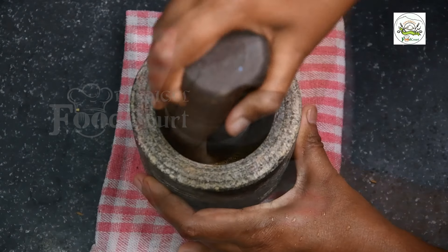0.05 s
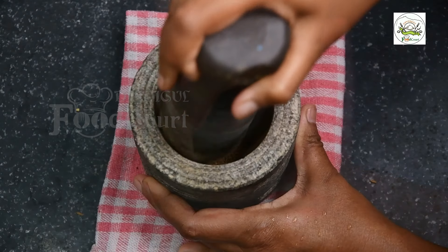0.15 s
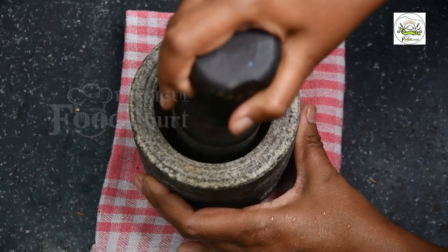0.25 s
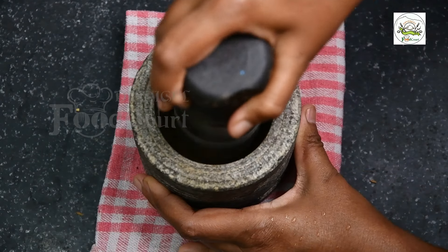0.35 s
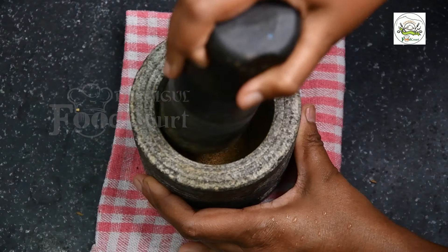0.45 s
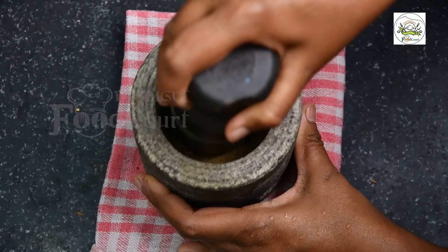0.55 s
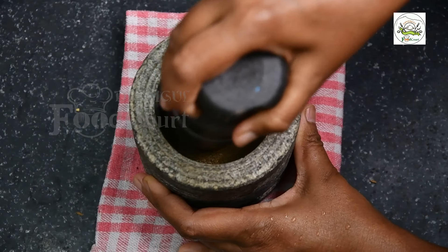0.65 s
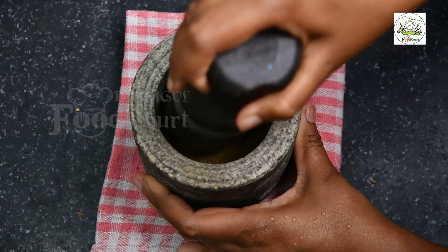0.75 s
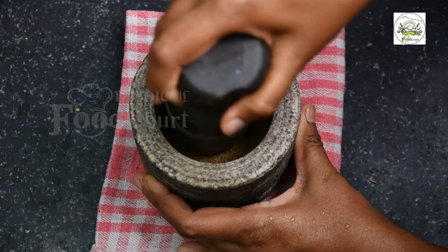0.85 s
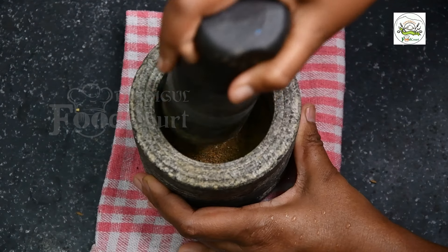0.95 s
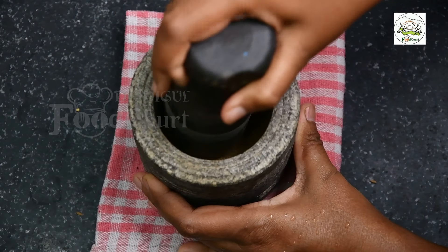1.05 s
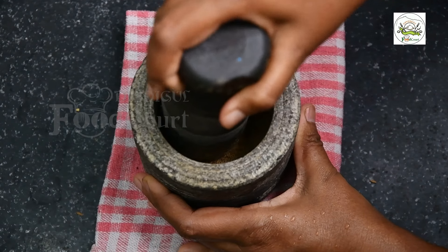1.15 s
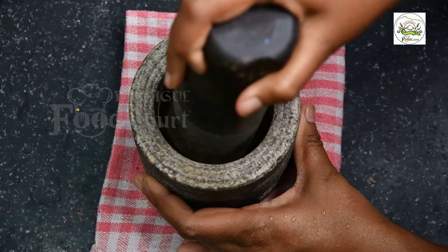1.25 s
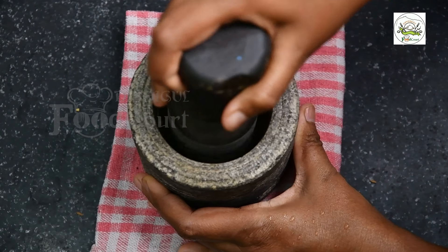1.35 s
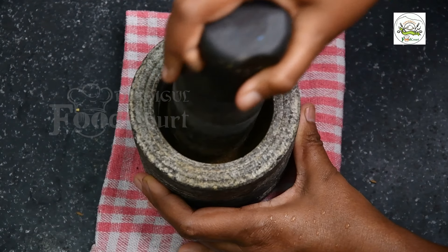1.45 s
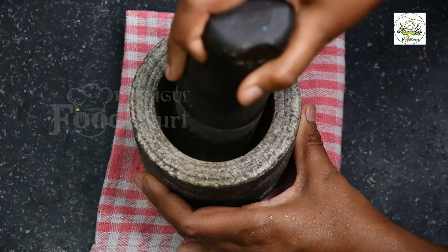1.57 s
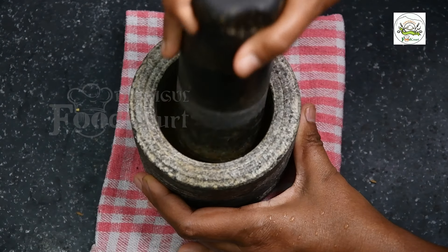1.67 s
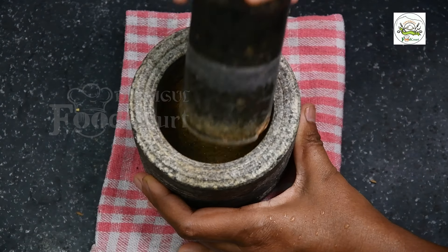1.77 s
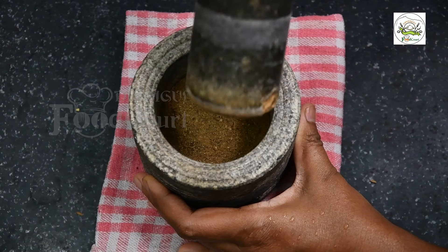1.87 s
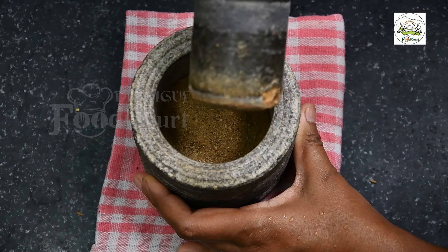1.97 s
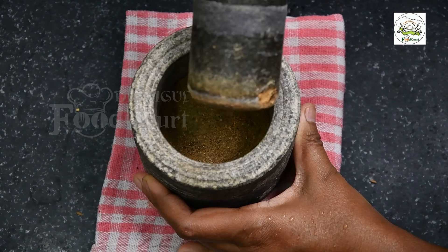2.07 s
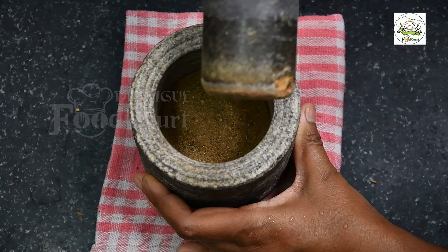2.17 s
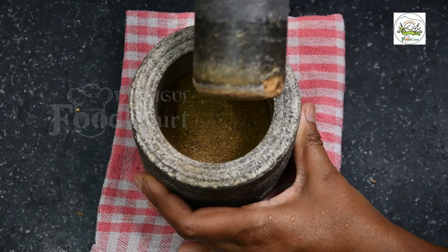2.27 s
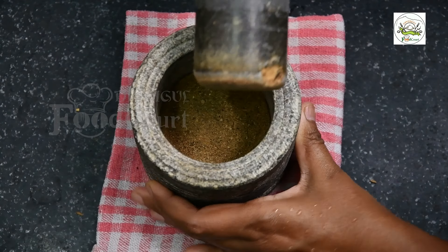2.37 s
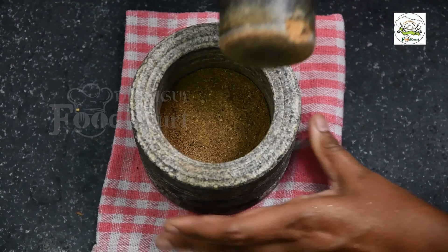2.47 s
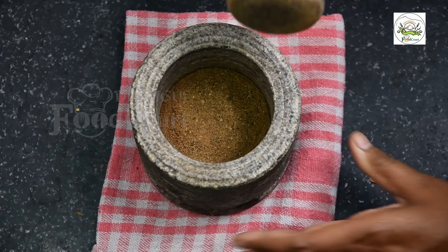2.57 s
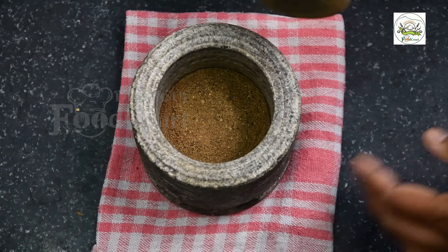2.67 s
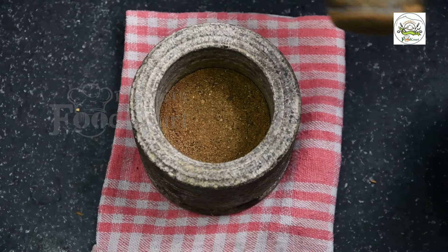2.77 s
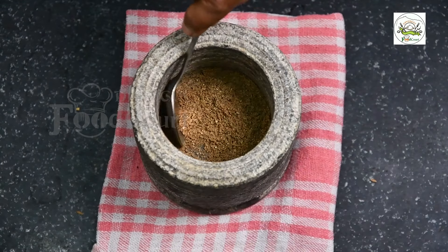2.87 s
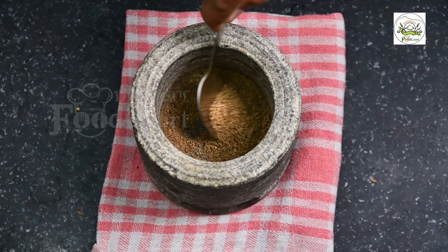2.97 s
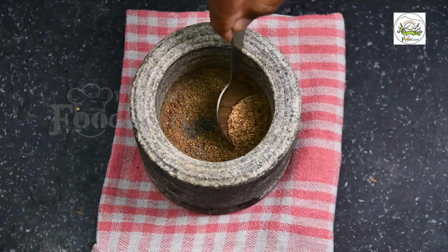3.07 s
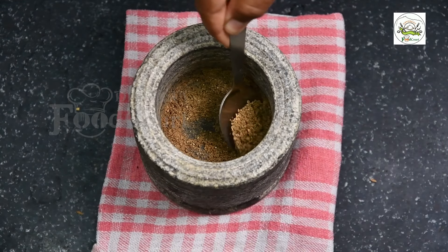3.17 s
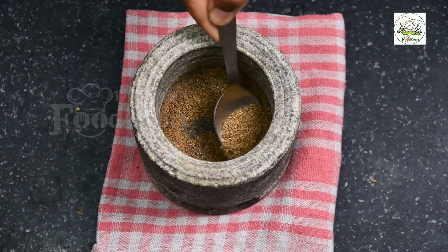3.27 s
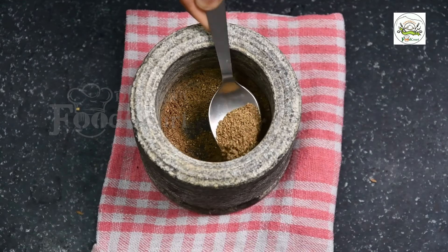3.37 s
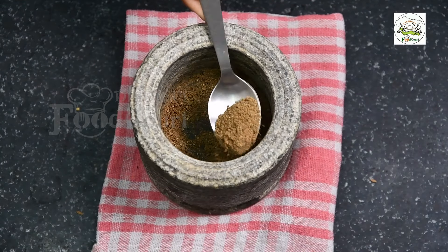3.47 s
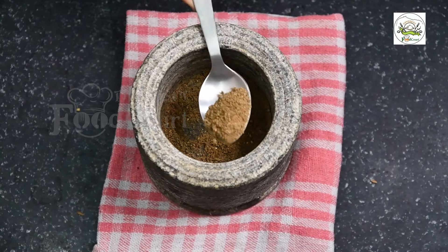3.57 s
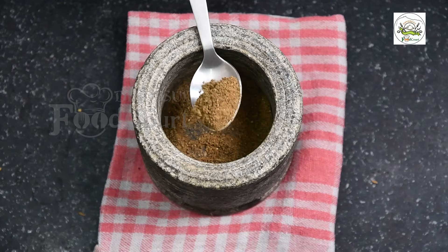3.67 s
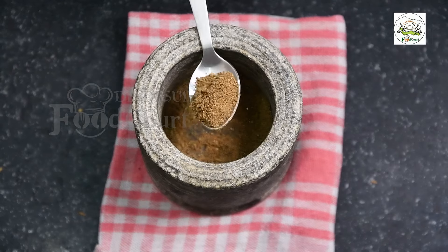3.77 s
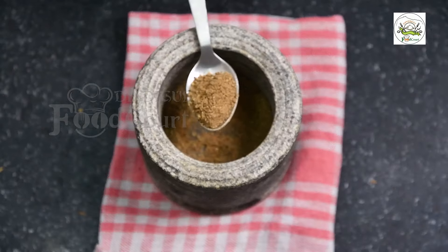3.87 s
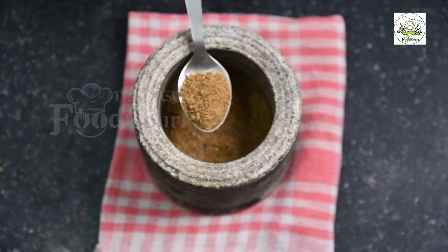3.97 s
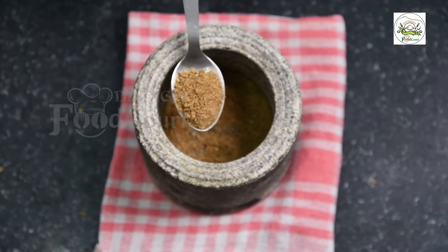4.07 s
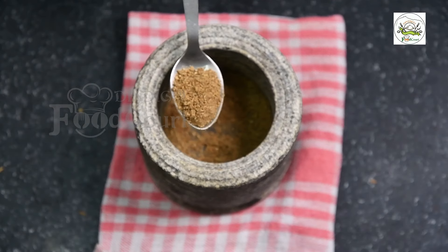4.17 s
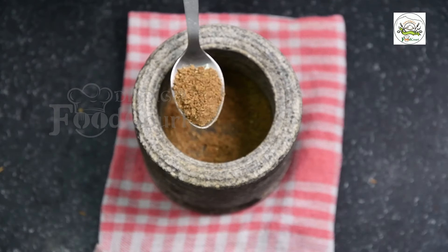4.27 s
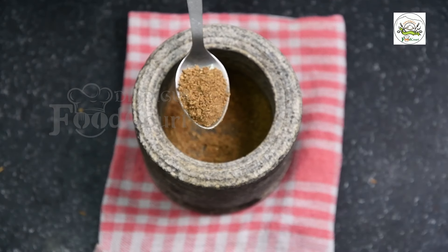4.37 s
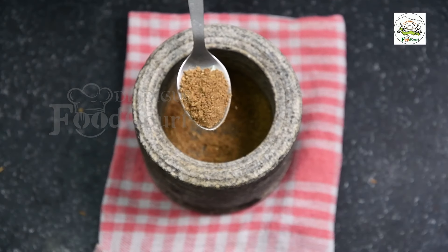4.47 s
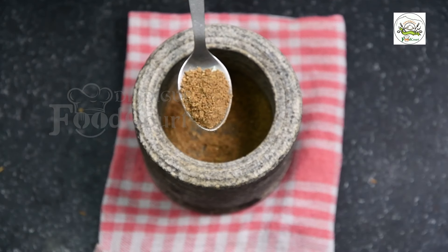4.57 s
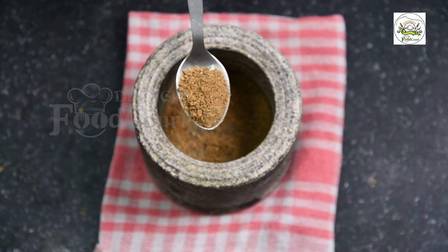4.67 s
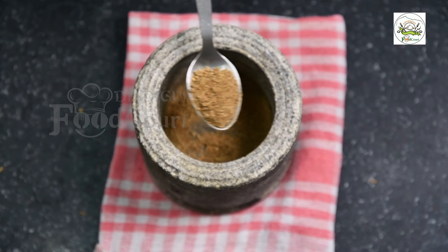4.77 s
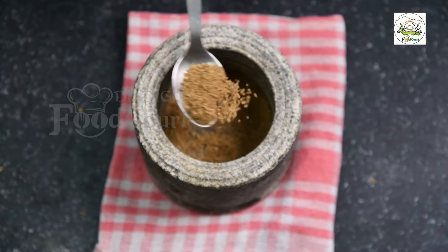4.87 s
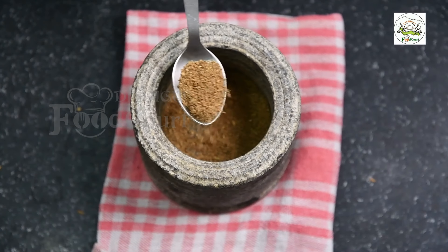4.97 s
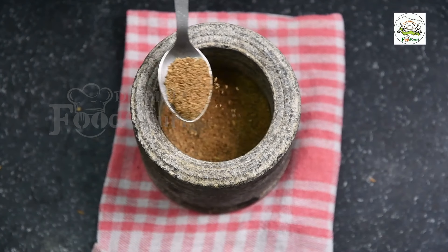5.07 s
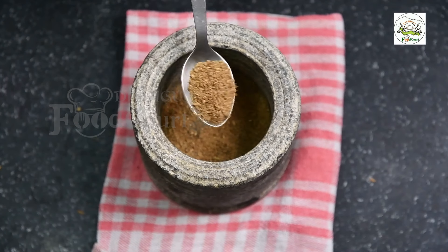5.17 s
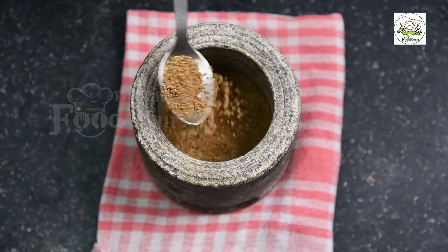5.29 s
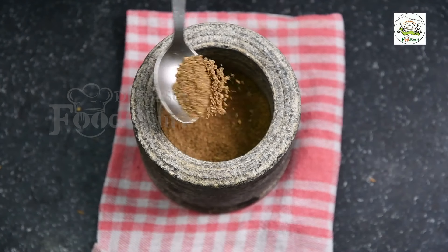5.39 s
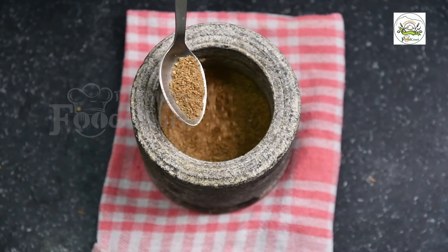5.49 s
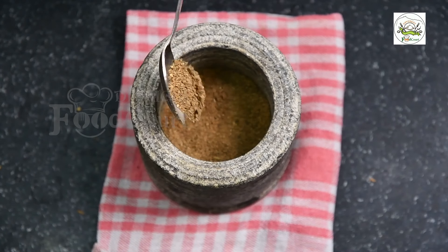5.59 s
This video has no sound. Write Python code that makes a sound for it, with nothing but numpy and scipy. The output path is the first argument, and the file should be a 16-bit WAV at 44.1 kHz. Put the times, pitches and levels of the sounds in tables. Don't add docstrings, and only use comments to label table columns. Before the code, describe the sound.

Heavy hollow stone thumps in a hard kitchen stop after two seconds; quiet spoon scraping and one small rim tap follow over faint hiss.

```python
import sys
import numpy as np
from scipy import signal
from scipy.fft import rfft, irfft, next_fast_len
from scipy.io import wavfile

SR = 44100
rng = np.random.default_rng(int(sys.argv[2]) if len(sys.argv) > 2 else 0)


def int16_out(signal):
    q = np.round(np.clip(np.atleast_2d(signal).T, -1, 1) * 32767)
    wavfile.write(sys.argv[1], SR, q.astype(np.int16))


def gain_from_db(level_db):
    decades = np.asarray(level_db, float) / 20
    return 10 ** decades


N = 248283


def unit(x):
    return x / np.sqrt(np.mean(x ** 2) + 1e-20)


def peak(x):
    return x / np.abs(x).max()


def noise(count):
    return rng.standard_normal(count)


def along(points, hz):
    point_hz, value = np.transpose(points)
    return np.interp(np.log(hz + 1), np.log(point_hz + 1), value)


def filtered(x, response):
    size = next_fast_len(len(x) + SR // 10)
    spectrum = rfft(x, size) * response(np.fft.rfftfreq(size, 1 / SR))
    return irfft(spectrum, size)[:len(x)]


def resonances(peaks, scatter_db=0):
    gains = gain_from_db(np.array(peaks)[:, 2] + scatter_db * noise(len(peaks)))

    def response(f):
        total = 0
        for k, ((hz, width_hz, _), gain) in enumerate(zip(peaks, gains)):
            damping = 1j * f * width_hz
            total = total + (-1) ** k * gain * damping / (hz * hz - f * f + damping)
        return total
    return response


def highpass(f, corner_hz, order):
    return (1j * f / (corner_hz + 1j * f)) ** order


def ringing(modes, swell_s, t):
    total = 0
    for hz, level_db, t60_s in modes:
        total = total + gain_from_db(level_db + rng.standard_normal() - 60 * t / t60_s) * np.sin(2 * np.pi * hz * t)
    return (1 - np.exp(-t / swell_s)) * total


def struck(response, contact_s, soft_hz, t):
    push = t / contact_s * gain_from_db(-60 * t / contact_s) * (1 + .3 * noise(len(t)))
    rounded = lambda f: 1 / (1 + .9j * f / soft_hz - (f / soft_hz) ** 2) ** 4
    return peak(filtered(push, lambda f: response(f) * rounded(f)))


# hz, t60_s
KITCHEN = [(100, 1), (500, .55), (1200, 0.77), (2400, 0.6), (3300, 0.5), (4300, 0.38), (7500, .4),
           (11000, 0.078)]
# delay_s, level_db
WALLS = [(.004, -6.5), (.009, -17.5), (0.0135, -10.5), (0.017, -12), (0.028, -16.5), (0.056, -19.5)]


def add(track, start_s, sound, wet_db):
    hz, t, z = signal.stft(noise(3 * SR // 4), SR, nperseg=256)
    tail = signal.istft(z * gain_from_db(-60 * t / along(KITCHEN, hz)[:, None]), SR, nperseg=256)[1]
    tail = np.pad(tail / np.linalg.norm(tail), (round(0.0045 * SR), 0))
    for delay_s, level_db in WALLS:
        tail[round(delay_s * SR)] += gain_from_db(level_db + 4)
    heard = gain_from_db(wet_db) * signal.fftconvolve(sound, tail)
    heard[:len(sound)] += sound
    start = round(start_s * SR)
    part = track[max(start, 0):][:len(heard) + min(start, 0)]
    part += heard[max(-start, 0):][:len(part)]


def air(hz, width_hz, under_db):
    modes = resonances([(0.6 * hz, 250, under_db - 10.5), (.48 * hz + 440, 0.84 * width_hz, under_db),
                        (hz, width_hz, 0), (1.193 * hz, 170, -16)])
    return lambda f: modes(f) * highpass(f, 450, 3)


def knocked(peaks):
    modes = resonances(peaks, 1.0)
    return lambda f: modes(f) * highpass(f, 1100, 2)


# hz, level_db, t60_s
BOOM = [
    (96.75, 2, 0.54),
    (106.3, -5, 0.68),
    (72, -21, .3),
]


def boom(start_s, level_db):
    start = round(max(start_s, 0) * SR)
    t = np.maximum(np.arange(N) / SR - start_s, 0)[start:][:SR]
    return np.pad(gain_from_db(level_db) * ringing(BOOM, 0.013, t), (start, N))[:N]


# start_s, peak_db, air_hz, thud_db, crack_db
BLOWS = [
    (-.2, -1.5, 1190, -14, -1.5),
    (0.0339, 3.5, 1269, -8, -23),
    (0.2947, -1, 1220, -8.5, -23.5),
    (.560, -27, 1160, -19.5, -28),
    (.824, -9, 1195, -15, -25),
    (1.0917, -1.5, 1200, -9, -22),
    (1.3423, 2, 1242, -11, -11.5),
    (1.6076, 4.5, 1239, -12, -13.5),
    (2.0651, -1.5, 1110, -33, -7),
    (2.35, -9.5, 1126, -47, -20),
]
# blow_db, width_hz
AIR_WIDTH = [(-26, 200), (-8, 140), (-.5, 115), (3, 65), (6.5, 50)]
# blow_db, contact_hz
HARDNESS = [(-28, 1600), (-10, 2300), (-6.5, 3000), (3, 3400)]
# hz, width_hz, level_db
STONE = [(1604, 130, -4.5), (2154, 250, -9.5), (2650, 68, -9), (3060, 430, -11), (3714, 230, -11),
         (4335, 750, -11)]
# hz, level_db, t60_s
PESTLE = [(7537, 0, .05), (7400, -10, .03), (8942, -7, .025)]
# hz, width_hz, level_db
COUNTER = [(159.3, 83, -1.5), (235.5, 40, 4), (306, 74, 1.5), (433, 38, 6.5), (570, 83, 1.5), (737, 37, -1),
           (830, 65, -1)]
BOOM_DB, BOOM_LOSS = -18, 0.24
RING_DB, RING_GROWS = -35, 1.1
THUD_LATE_S, THUD_FIRST_DB = .0108, -3.5


def pestle_blows():
    track, t = np.zeros(N), np.arange(SR // 5) / SR
    for start_s, peak_db, air_hz, thud_db, crack_db in BLOWS:
        width_hz = np.interp(peak_db, *np.transpose(AIR_WIDTH))
        hard_hz = np.interp(peak_db, *np.transpose(HARDNESS))
        blow = gain_from_db(peak_db) * struck(air(air_hz, width_hz, under_db=-6), 0.0043, 2400, t)
        crack = gain_from_db(crack_db + 1.5) * struck(knocked(STONE), 0.0013, hard_hz, t)
        ring = gain_from_db(RING_DB + RING_GROWS * crack_db) * ringing(PESTLE, 0.0027, t)
        add(track, start_s, gain_from_db(4.0) * (blow + crack + ring), wet_db=-11.0)
        thud = gain_from_db(thud_db) * struck(resonances(COUNTER, 0.73), 0.0013, hard_hz / 3, t)
        add(track, start_s + 0.00057, gain_from_db(THUD_FIRST_DB) * thud, wet_db=-6)
        add(track, start_s + THUD_LATE_S, thud, wet_db=-4.5)
        track += boom(start_s + 0.015, thud_db + BOOM_DB - BOOM_LOSS * peak_db)
    return track


# time_s, level_db, pitch_hz
DRONE = [(2.801, -75.5, 308), (3.03, -71, 314), (3.27, -83, 309), (3.33, -64.5, 306), (3.5, -88, 303),
         (3.619, -62.5, 306), (3.74, -80, 298), (3.92, -90, 311), (3.97, -61, 312), (4.14, -80, 310),
         (4.2, -63, 305), (4.34, -70.5, 308), (4.68, -72, 310), (4.78, -63.5, 306), (5.2, -63, 318),
         (5.38, -79.5, 304), (5.44, -65.5, 309), (5.63, -69.5, 300)]


def appliance():
    time_s, level_db, pitch_hz = np.transpose(DRONE)
    t = np.arange(N) / SR
    flutter = filtered(noise(N), lambda f: 1 / (1 + (f / 28) ** 4))
    phase = 2 * np.pi * np.cumsum(np.interp(t, time_s, pitch_hz)) / SR
    return gain_from_db(np.interp(t, time_s, level_db)) * unit(flutter * np.sin(phase))


# hz, level_db_per_hz
HISS = [(15, -58), (25, -28), (43, -25.5), (210, -12.5), (306, -3.5), (445, -16), (850, -14.5), (1080, -17),
        (1270, -14), (1580, -20.5), (2120, -26), (3730, -34), (15600, -61.5)]
HISS_DB = -69


def hiss():
    return gain_from_db(HISS_DB) * unit(filtered(noise(N), lambda f: gain_from_db(along(HISS, f))))


# start_s, peak_db, wall_hz, air_db, ring_db
KNOCKS = [(.016, -27, 2879, -9, -45.5), (0.194, -9, 2650, -5.5, -22.5), (0.2134, -26, 2990, 6.5, -30.5),
          (0.255, -38.5, 2690, -10, -4.5), (.5207, -10.5, 2650, -12, -32), (0.5462, -11.5, 2650, -10, -35),
          (0.8148, -6, 2612, -9, -35.5), (0.9371, -18.5, 2650, -3, -45), (1.0402, -16.5, 2600, -4.5, -33.5),
          (1.078, -30.5, 2506, -1, -17.5), (1.1861, -21, 2654, -1.5, -23), (1.237, -42.5, 2700, -3.5, -8),
          (1.307, -42.5, 2700, -4.5, -8), (1.6908, -11, 2250, -9.5, -45.5), (1.713, -24, 2250, 5.5, -41.5),
          (1.763, -21.5, 2764, 5, -36.5), (2.451, -36, 2080, -12.5, -56.5)]
KNOCK_SOFT, KNOCK_SHARPENS = 1.2, .8


def wall_knocks():
    track, t = np.zeros(N), np.arange(SR // 5) / SR
    for start_s, peak_db, wall_hz, air_db, ring_db in KNOCKS:
        soft_hz = wall_hz * (KNOCK_SOFT + KNOCK_SHARPENS * gain_from_db(peak_db))
        wall = struck(knocked([(wall_hz, 200, 3)] + STONE), .0006, soft_hz, t)
        puff = gain_from_db(air_db + 0.5) * struck(air(1200, 150, under_db=4), 0.006, 2100, t)
        ring = gain_from_db(ring_db - 4.5) * ringing(PESTLE, .0015, t)
        add(track, start_s, gain_from_db(peak_db + 1.5) * (wall + puff + ring), wet_db=-10.0)
    return track


# start_s, level_db
SPRAY = [
    (0.072, -40.5),
    (0.296, -57),
    (0.549, -56),
    (0.561, -48),
    (0.823, -54),
    (1.095, -59.5),
    (1.351, -55),
    (1.62, -64),
    (2.07, -53),
]
# hz, level_db_per_hz
POWDER = [(1500, -32), (2800, 4), (5000, -7.5), (9000, -13.5), (12000, -26), (14000, -43.5), (16000, -69.5)]
SPRAY_T60_S, SPRAY_SWELL_S = .11, .0005


def powder_spray():
    track, t = np.zeros(N), np.arange(SR // 5) / SR
    for start_s, level_db in SPRAY:
        grit = unit(filtered(noise(len(t)), lambda f: gain_from_db(along(POWDER, f))))
        swell = 1 - np.exp(-(t / SPRAY_SWELL_S) ** 2)
        burst = 1 + 3 * gain_from_db(-60 * t / .006)
        add(track, start_s, gain_from_db(level_db - 60 * t / SPRAY_T60_S) * swell * burst * grit, wet_db=-13.5)
    return track


# centre_s, level_db, half_length_s
TRAFFIC = [
    (2.499, -81.5, .2),
    (3.05, -79, 0.31),
    (3.95, -77.5, 0.4),
    (4.555, -90.5, 0.24),
    (5.102, -87, 0.21),
    (5.66, -81.5, .1),
]


def traffic():
    t = np.arange(N) / SR
    low = unit(filtered(noise(N), lambda f: resonances([(100, 50, 0)])(f) ** 2))
    level = sum(gain_from_db(db - 7.6 * ((t - centre_s) / half_s) ** 2) for centre_s, db, half_s in TRAFFIC)
    return level * low


# centre_s, level_db, hz, width_hz
CREAKS = [(2.808, -66, 1710, 397.4), (2.871, -61.5, 1470, 594), (2.86, -62, 934, 203),
          (2.95, -58.5, 905, 200), (3.58, -72, 1293, 69.8), (3.706, -62, 1070, 200), (3.929, -70, 1300, 70),
          (3.859, -69.5, 1728, 70), (3.921, -75, 1766, 70), (4.369, -87, 2727, 70), (4.84, -84.5, 2710, 70),
          (5.02, -81, 2700, 70), (5.411, -88.5, 2724, 70.2), (5.53, -82.5, 2700, 69.8)]


def spoon_creaks():
    track, t = np.zeros(N), np.arange(SR // 6) / SR
    for centre_s, level_db, hz, width_hz in CREAKS:
        rub = unit(filtered(noise(len(t)), lambda f: resonances([(hz, width_hz, 0)])(f) ** 2))
        add(track, centre_s - .05, gain_from_db(level_db) * rub * np.exp(-((t - .05) / 0.036) ** 2), wet_db=-4.5)
    return track


# hz, width_hz, level_db
STEEL = [(2250, 180, -11), (3138, 340, 5.5), (4195, 145, 4.5), (5000, 840, -5.5), (6180, 136, 0.5),
         (6760, 230, -12), (7500, 99, -3.5), (8400, 130, -6), (9740, 68, -5), (11000, 150, -10.5),
         (12260, 330, -13.5), (14370, 640, -26)]


def steel(x, scatter_db, tilt_db_per_octave):
    modes = resonances(STEEL, scatter_db)

    def response(f):
        tilt = gain_from_db(tilt_db_per_octave * np.log2(f / 4000 + 1e-3))
        return modes(f) * np.abs(modes(f)) * tilt / (1 + (f / 15000) ** 14)
    return filtered(x, response)


# start_s, peak_db, contact_s, crack_db, ring_db
TAPS = [(2.869, -53.5, 0.0017, -18, 13), (2.954, -49, 0.0095, 10.5, 8), (3.043, -43, 0.0094, 12.5, 17),
        (3.084, -54, 0.0026, 16, -16), (3.168, -53, 0.0058, 16, 7), (3.176, -57, 0.002, 23.5, -3),
        (3.279, -42, 0.013, 8, 18), (3.334, -33, 0.00055, 13, -0.5), (3.448, -44, 0.0024, -20, 12),
        (3.552, -70, 0.0035, -11, -22), (3.654, -41, 0.0081, -26, -21), (3.742, -27, 0.0049, -43, -38)]
TAP_HZ, TAP_RISE_HZ = 1042, 3500


def spoon_taps():
    track, t = np.zeros(N), np.arange(SR // 6) / SR
    stone = lambda f: resonances(STONE, 2)(f) * highpass(f, 2500, 2) / (1 + (f / 5000) ** 6)
    for start_s, peak_db, contact_s, crack_db, ring_db in TAPS:
        hz = TAP_HZ + TAP_RISE_HZ * gain_from_db(peak_db)
        skid = noise(len(t)) * np.sqrt(t / contact_s) * gain_from_db(-40 * t / contact_s)
        tap = struck(lambda f: resonances([(hz, 280, 0)])(f) ** 3, contact_s, 1540, t)
        crack = gain_from_db(crack_db - 3) * peak(filtered(skid, stone))
        ring = gain_from_db(ring_db - 9.5) * peak(steel(skid, 1.4, 7.5))
        swell = 1 - np.exp(-(t / 0.00064) ** 2)
        add(track, start_s, gain_from_db(peak_db) * swell * (tap + crack + ring), wet_db=-10.0)
    return track


# full_s, hold_s, level_db, bowl_rub_db
STROKES = [
    (2.953, 0.04, -54.5, -6),
    (3.004, 0.035, -52.5, -3.5),
    (3.05, .05, -58.5, -1.5),
    (3.171, .003, -62, -9),
    (3.298, .003, -51, -6),
    (3.342, .025, -67, -9),
    (3.736, 0.025, -66, -0.5),
    (3.82, .005, -83, -10),
]
DIG_DB_PER_S, LIFT_DB_PER_S = 650, 550
RUSTLE_DB = -8


def spoon_strokes():
    track, t = np.zeros(N), np.arange(-SR // 12, SR // 5) / SR
    bowl_modes = [(550, 500, 0), (1100, 400, 0), (1700, 400, -2)]
    for full_s, hold_s, level_db, bowl_db in STROKES:
        dig_db = DIG_DB_PER_S * np.minimum(t, 0)
        lift_db = LIFT_DB_PER_S * np.maximum(t - hold_s, 0)
        clumps = unit(filtered(noise(len(t)), lambda f: 1 / (1 + (f / 120) ** 2)))
        grit = noise(len(t)) * gain_from_db(3.5 * clumps)
        ring = unit(steel(grit, 1.6, .4))
        rustle = unit(filtered(grit, lambda f: gain_from_db(along(POWDER, f / 0.91))))
        bowl = unit(filtered(grit, lambda f: resonances(bowl_modes)(f) / (1 + (f / 4000) ** 4)))
        stroke = ring + gain_from_db(RUSTLE_DB) * rustle + gain_from_db(bowl_db) * bowl
        add(track, full_s + t[0], gain_from_db(level_db + dig_db - lift_db) * stroke, wet_db=-9.5)
    return track


# start_s, level_db
RIM = (3.744, -40.5)
# hz, width_hz, level_db
BOWL_RIM = [(2125, 51, 4), (2360, 78, 3), (3780, 74, -12), (4590, 170, -3.5), (5670, 360, -13.5),
            (6760, 150, -4), (8080, 190, -15.5), (9700, 200, -22), (11300, 220, -12)]


def rim_knock():
    track, t = np.zeros(N), np.arange(SR // 6) / SR
    start_s, level_db = RIM
    ring = 40 * filtered(gain_from_db(-60 * t / 0.00039), resonances(BOWL_RIM))
    add(track, start_s, gain_from_db(level_db) * ring, wet_db=-14.5)
    return track


def scene():
    pestle = pestle_blows() + wall_knocks() + powder_spray()
    spoon = spoon_creaks() + spoon_taps() + spoon_strokes() + rim_knock()
    return (pestle + appliance() + hiss() + traffic() + spoon)[None]


def band_limit(x):
    return signal.sosfilt(signal.butter(12, 15700, fs=SR, output="sos"), x)


# time_s, level_db
FADE = [(0, -3.4), (.034, -3), (.295, -.3), (.33, 0)]


def record(dry):
    fade = gain_from_db(np.interp(np.arange(N) / SR, *np.transpose(FADE)))
    return band_limit(fade * np.clip(dry, -1, 1))


dry = scene()
out = record(dry)
int16_out(out)
```